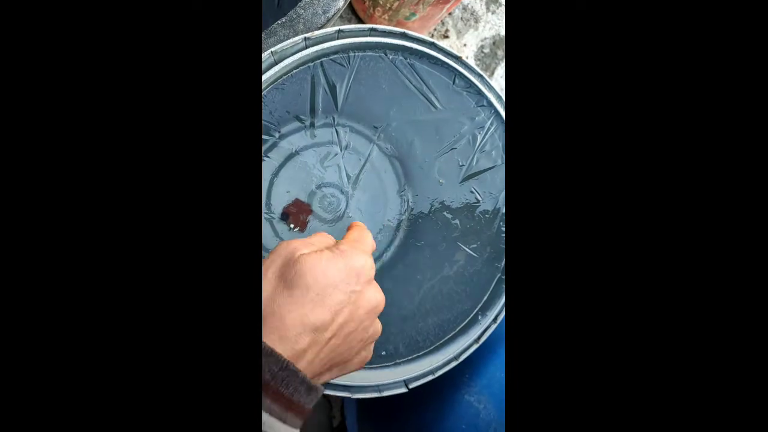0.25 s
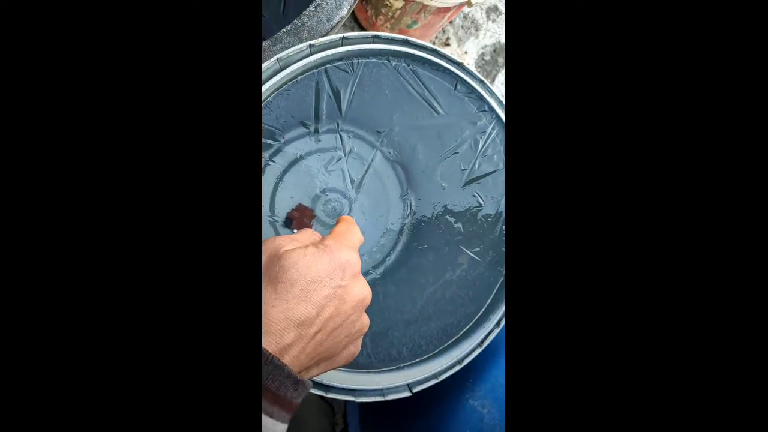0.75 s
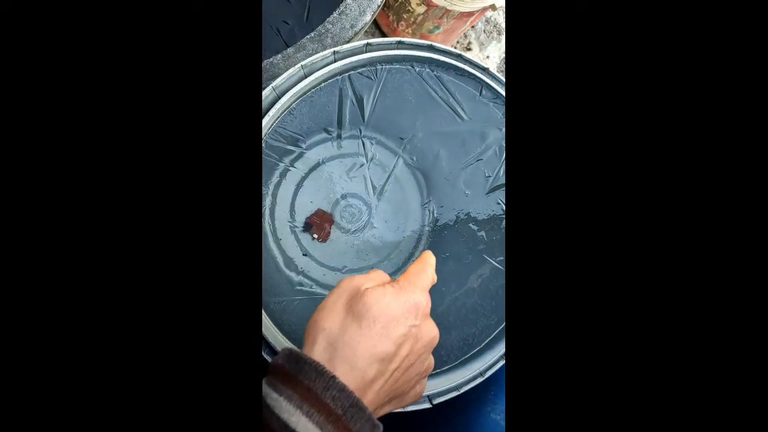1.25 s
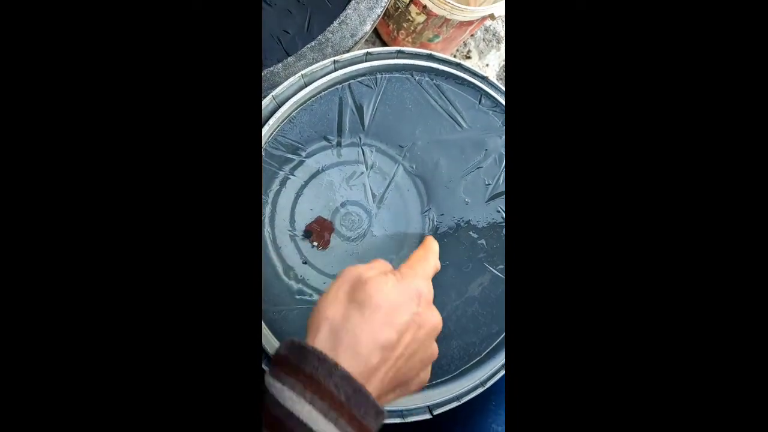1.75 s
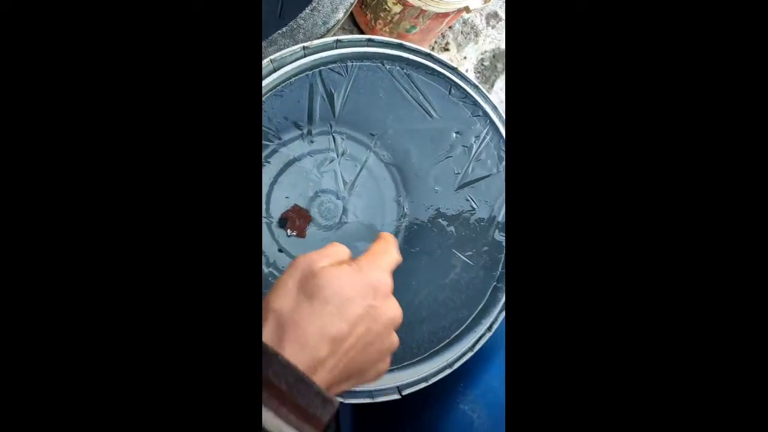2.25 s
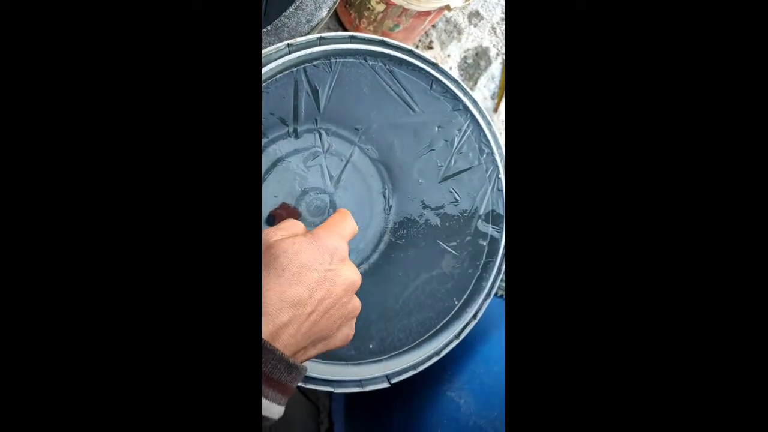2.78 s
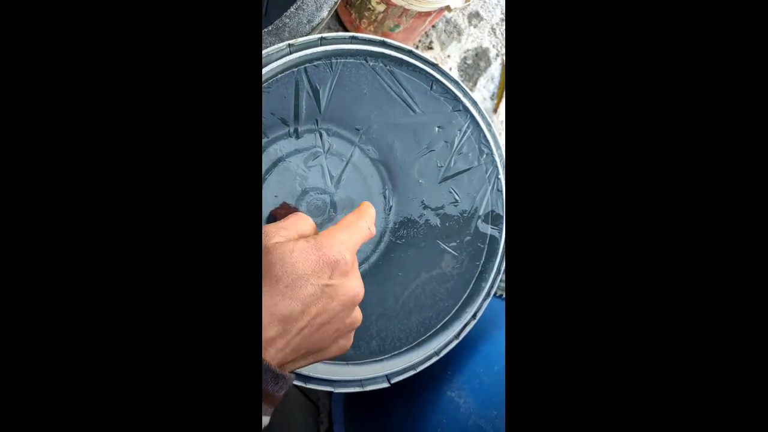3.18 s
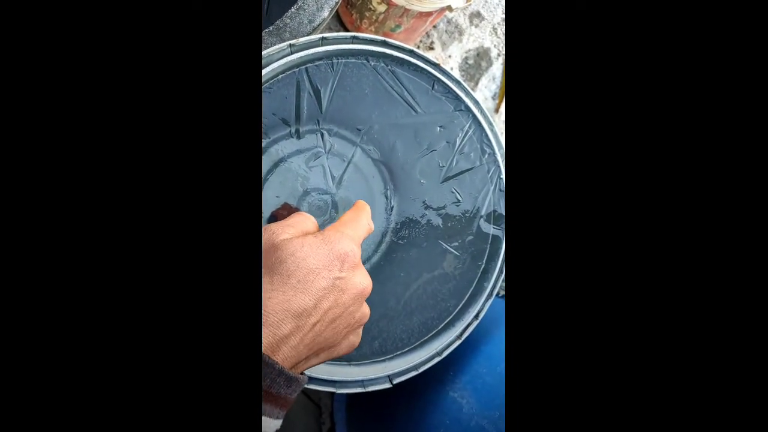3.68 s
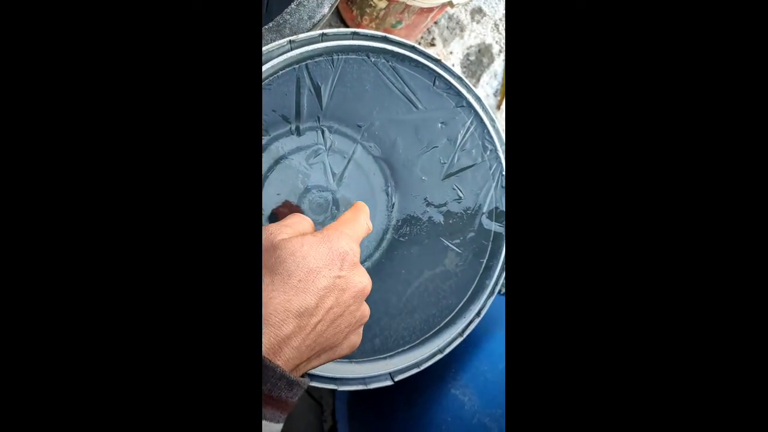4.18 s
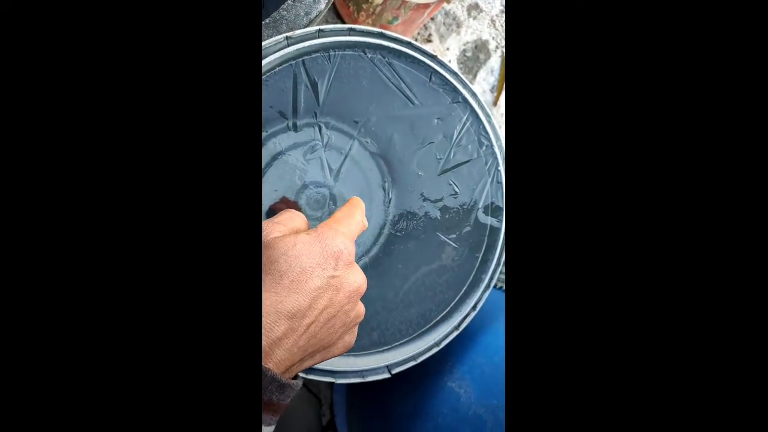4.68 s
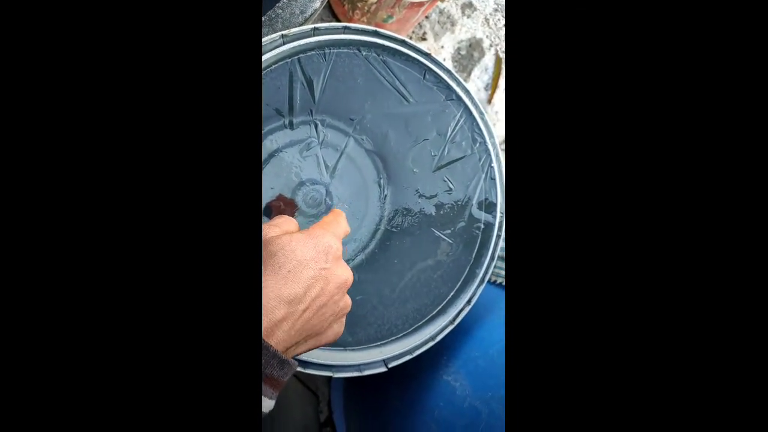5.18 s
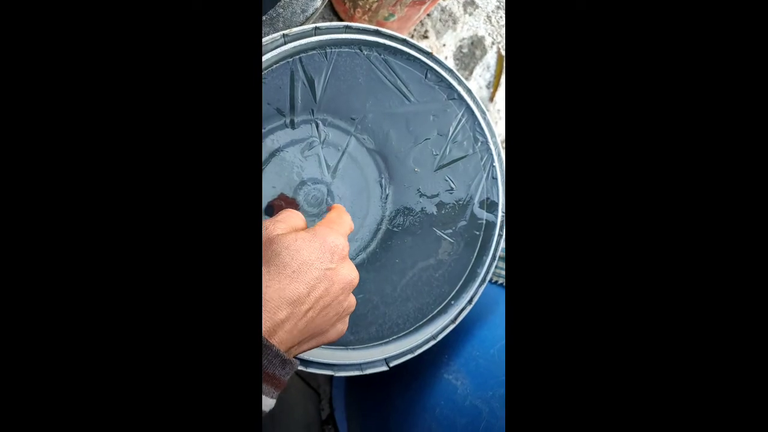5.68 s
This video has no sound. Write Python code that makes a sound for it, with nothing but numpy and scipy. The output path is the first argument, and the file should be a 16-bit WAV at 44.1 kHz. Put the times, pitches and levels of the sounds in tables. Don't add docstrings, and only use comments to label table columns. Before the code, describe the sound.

A quiet yard heard through a stereo phone microphone close above a bucket with a thin cracked ice sheet. From 0 to 1 s, five light nail taps tick softly, roughly every quarter second, each with a small dull knock and low hum. From 1.2 to 2.06 s the finger slides: grainy rasp, thin wet hiss, sharper catches around 1.4 s and a stronger rub near 1.9 s. At 2.3 s tapping resumes harder; brittle, glassy snaps hit at 2.56 and 3.03 s, then 3.3, 3.57, 3.99, 4.46 and 4.93 s, with short crackling tails, brief scuffs and bucket thuds. Softer taps follow at 5.2, 5.44, 5.64 and 5.87 s. A distant bird whistles fast, high, falling warbles at 0, 0.8, 1.7, 2.2 and 4.7 s, one barely audible at 4.2. Faint drones waver after 3 s. Breeze bumps low on the left throughout, with slight sleeve rustles.

```python
import sys
import numpy as np
from scipy import signal
from scipy.fft import rfft, irfft, next_fast_len
from scipy.io import wavfile
from scipy.ndimage import uniform_filter1d

SR = 44100
rng = np.random.default_rng(int(sys.argv[2]) if len(sys.argv) > 2 else 0)


def log_audio(samples):
    frames = np.atleast_2d(samples).T
    limited = np.clip(frames, -1, 1)
    pcm = np.round(limited * 32767).astype(np.int16)
    wavfile.write(sys.argv[1], SR, pcm)


def volts_from_decibels(level):
    exponent = np.asarray(level, float) / 20
    return 10 ** exponent


N = 261954
LEAD = 220

# [t/s, peak level/dB, brightness/dB per octave, plate ring f/Hz, after-crackle/dB]
CRACKS = [(0.0003, -50.5, -5, 3700, -10), (0.2544, -40, -1.5, 3250, -10), (0.2598, -36, 4.5, 3280, -25.5),
          (0.5363, -47.5, -4, 3800, -13), (0.7506, -44, -2, 3920, -10.5), (0.9763, -53, 0.5, 3130, -7),
          (2.3139, -31, -4, 3550, -22), (2.319, -39, -2, 3540, -30), (2.5599, -16, 0.3, 3260, -23),
          (2.8169, -36.5, -3, 3670, -19), (3.0316, -15, 0, 3770, -27.5), (3.296, -26.5, 2, 3700, -22),
          (3.572, -21.5, 2.5, 3470, -26), (3.9878, -17.5, 7, 4070, -26.5), (4.4621, -22, 2.5, 3760, -18),
          (4.9317, -21.5, -1.5, 3700, -26.5), (5.1927, -32.5, -2, 3700, -19.5),
          (5.44, -41, -1.7, 3800, -16.5), (5.6414, -31, -2.5, 3700, -23),
          (5.8726, -38.5, -2.5, 3200, -15.5)]
# [fracture spread/ms, lower ring f/Hz, its level/dB]
SHARDS = [(1.2, 1500, -6), (0.69, 1470, 9), (1, 3270, 6.5), (0.78, 1500, -1), (0.66, 2070, 7),
          (1.3, 2200, 4), (0.6, 4300, 0.5), (.8, 3500, -11), (1.4, 4700, 5), (0.54, 1280, 6),
          (1.07, 1550, -0.5), (1.33, 2990, 4), (1.04, 1100, 9.5), (0.57, 1600, 13), (0.79, 2540, 8),
          (0.49, 2000, 9), (1.05, 4120, -0.5), (1.4, 3400, 2.5), (1.2, 1460, 8.5), (1.7, 3800, 4.5)]
# [f/Hz, level/dB]
PLATES = [(3100, 3), (6000, -1), (6000, 4), (6500, 2), (6500, -1), (6500, 0), (3200, 6), (6500, -16),
          (3040, 1), (6500, -1), (3060, -6), (4200, 0), (6100, 7), (6100, 4.5), (6000, 1), (2136, -8),
          (4140, 2.5), (5960, -1.5), (4400, 1.5), (5000, -3)]
# [tap t/s, [(f/Hz, level over the snap/dB), ..]]
PINGS = [
    (2.316, [(3450, 2.5), (4830, 9), (7730, 11)]),
    (2.562, [(3340, 5.5), (5430, 4), (6130, 6.5), (7860, 5.5), (8520, 4.5), (11100, 6.5)]),
    (3.033, [(2190, 7.5), (2680, 9.5), (3760, 7), (4080, -6.5), (5330, 6.5), (7350, 4.5), (7870, 1.5), (9620, 2.5)]),
    (3.296, [(3260, 7), (4030, 10), (6630, 5), (8300, 3.5)]),
    (3.573, [(3610, -3), (4440, 5), (6050, -3), (7690, 12)]),
    (3.987, [(1740, 9.5), (2700, -5), (4010, 4.5), (5490, 8), (7020, 8), (9160, 4), (10900, 8.5)]),
    (4.461, [(3130, 4), (3740, 2), (4130, 6), (7340, 1), (9420, 6)]),
    (4.932, [(3120, 4), (3760, 5), (4330, 4.5), (8300, 5.5)]),
]
# [t/s, peak level/dB, brightness/dB per octave]
BOUNCES = [(0.172, -50, 9.5), (0.1905, -64, 4), (0.552, -72, 8), (0.567, -66, 0), (1.0157, -61.5, 0),
           (1.036, -61.5, 1), (1.2836, -54, -1), (1.651, -67, -4), (2.354, -55.5, -5), (3.617, -55.5, 1),
           (4.0328, -40.5, 0), (0.297, -66, -4), (5.892, -58, 4), (4.5049, -44.5, 0), (5.463, -56.5, 8),
           (5.685, -57, 0.5), (5.692, -60.5, -5)]
# [t/s, peak level/dB]
RUNS = [(3.9846, -33), (3.985, -21), (3.987, -23), (3.991, -31), (5.1892, -37.5), (5.6395, -35),
        (3.2948, -30.5), (4.4566, -34), (4.4596, -26), (4.4657, -31.5)]
# [t/s, peak level/dB]
MORE_RUNS = [
    (2.5635, -26),
    (3.9897, -24.5),
    (4.5068, -48),
]
# [f/Hz, level/dB per Hz]
SNAP = [(470, -60.5), (800, -19), (1730, -11.5), (1940, -13), (2200, -3), (2440, -9.5), (3750, 3.5),
        (4650, -4), (7920, -1), (12600, -7.5), (15100, -6), (15500, -19.5), (16500, -35.5)]
# [t/s, left-right level/dB]
HAND = [(0, -1.5), (1, -2), (2.3, -0.5), (3.3, 1), (3.6, -1), (4.46, 1.5), (4.93, 3), (5.2, 0.5),
        (5.44, 2.5), (5.9, -0.5)]
# [f/Hz, left-right level/dB]
PORTS = [(60, 6.5), (110, 3.5), (200, 4), (380, 4), (700, 3), (1290, -2), (2380, -1), (4400, -1),
         (6000, -5.5), (8120, -12), (11500, -8), (15000, -4)]

# [t/s, strength/dB, dead knock/dB, bucket hum/dB, deep sheet tone/dB]
KNOCKS = [(.001, -42, -13, 1.5, 6.5), (0.255, -34, -3, 0.5, 6.5), (0.536, -37.5, -38, -2, 3),
          (0.752, -36, -8.5, -2, 7.5), (0.981, -43, -4.5, 1, -4.5), (2.3148, -29, 3, -1.5, 2.5),
          (2.56, -27.5, 2.5, -3.5, -3), (2.817, -36, 0, 1.5, 3), (3.031, -32, -15.5, -2, -1),
          (3.2966, -33.5, 2.5, 0.5, 1.5), (3.5712, -30.5, 0, -3.5, -0.5), (3.9863, -29, 4.5, -1.5, -5.5),
          (4.4599, -30, 3, 0, -5), (4.932, -33.5, -0.5, 0, -0.5), (5.1921, -33, -2.5, -2, 0),
          (5.4424, -36, -0.5, -1.5, 1.5), (5.6413, -33.5, -1, -3, 2), (5.8752, -36.5, -2.5, 0, 5)]
# [dead knock f/Hz, ringing sheet level/dB]
BODIES = [(225, 3.5), (227, -0.5), (225, -2.5), (225, 2), (260, 0), (234, -0.5), (218, -1.5), (232, 3.5),
          (250, 0.5), (248, 0.5), (255, -0.5), (240, -6.5), (229, -4), (233, -1), (227.7, -1.5),
          (231.5, 0.5), (222, 1), (228, 4)]
# [f/Hz, level/dB]
NAIL_TICK = [(120, -11), (200, 0), (320, 6), (550, -0.5), (900, -3), (1600, -8.5), (3000, -20)]
# [f/Hz, level/dB, t60/s, sign of the mode shape under the finger]
DEAD = [(151, -34.5, 0.069, -1), (223.6, 4.5, 0.031, -1), (360, -14.5, 0.045, -1), (681, -21, 0.053, 1)]
# [f/Hz, level/dB, t60/s, sign]
SHEET = [(235, -11.5, 0.069, -1), (266, -17, 0.18, 1), (279.4, -11, 0.13, -1), (333.2, -24, .1, 1),
         (445, -21, 0.078, 1), (820, -32, .05, 1)]
# [f/Hz, level/dB, t60/s, sign]
DEEP = [(162, -25.5, 0.011, 1), (200.5, -11.5, 0.15, -1)]
# [f/Hz, level/dB, t60/s, sign]
BUCKET = [(49.6, -15, 0.27, 1), (54.4, -20.5, 1, 1), (65.8, -19.5, 1, -1), (77.5, -35.5, 0.83, 1),
          (82.5, -1.5, 0.11, -1), (96, -12.5, 0.21, -1), (104, -33, 0.12, -1)]

# [t/s, length/s, level/dB, hiss/dB]
SCUFFS = [(0.268, 0.029, -78, -2), (2.32, 0.041, -56, -21), (3.038, 0.073, -65, 1.5),
          (3.303, 0.065, -70, -1), (3.577, 0.054, -65, -1.5), (3.997, 0.064, -61.5, -2),
          (4.476, 0.049, -63.5, 7), (5.197, .035, -68, -6.5), (5.655, 0.057, -70, -1.5),
          (5.881, 0.022, -73.5, -4), (4.942, 0.056, -68, -2)]
# [t/s, speed as rasp level/dB, wetness as hiss level/dB]
GLIDE = [(1.198, -70, -70.5), (1.25, -68.5, -71), (1.3, -74, -75), (1.37, -67, -68.5), (1.415, -63, -58),
         (1.47, -65, -65), (1.5, -67, -66.5), (1.57, -90, -78), (1.645, -71, -72), (1.655, -73, -65.5),
         (1.74, -78, -74.5), (1.795, -66, -69.5), (1.83, -69, -67), (1.866, -69, -68), (1.9, -58, -59.5),
         (1.98, -60.5, -61), (2.005, -65.5, -68), (2.062, -75, -76)]
# [t/s, f/Hz]
NAIL_TILT = [(1.2, 3480), (1.358, 3650), (1.382, 3330), (1.522, 3360), (1.568, 3730), (1.608, 3350),
             (1.676, 3350), (1.742, 3640), (2.06, 3390)]
# [t/s, peak level/dB, length/ms]
SLIPS = [(1.2012, -58.5, 3), (1.233, -58, 3), (1.3315, -66, 1.5), (1.352, -60, 3.4), (1.3955, -44.5, 3.6),
         (1.4077, -35.5, 1.8), (1.418, -36.5, 1.2), (1.4226, -39, 2.8), (1.4452, -45.5, 3),
         (1.457, -51, 2.7), (1.4861, -43.5, 3.5), (1.8364, -55, 2), (1.8418, -49, 3), (1.8505, -53, 1.8),
         (1.891, -54, 2.6), (1.9138, -57, 3.4), (1.944, -47.5, 1.8), (2.04, -59, 2.7)]
# [t/s, level/dB, length/s, f/Hz]
FLEXES = [(1.21, -63, 0.0087, 432), (1.24, -60.5, 0.021, 308), (1.275, -60.5, 0.028, 308),
          (1.395, -64, 0.016, 320), (1.43, -64, 0.026, 545), (1.434, -61.5, 0.024, 1077),
          (1.53, -70.5, 0.079, 448), (1.585, -67.5, 0.015, 300), (1.63, -59.5, 0.023, 312),
          (1.655, -60.5, 0.0075, 900), (1.7, -71, 0.066, 300), (1.775, -57.5, 0.017, 260),
          (1.8, -55, 0.021, 443), (1.79, -65, 0.023, 840), (1.85, -57.5, 0.013, 312),
          (1.885, -66, 0.016, 272), (1.93, -64, 0.021, 326), (1.97, -62.5, 0.017, 214),
          (1.965, -66, 0.019, 480), (2.04, -66.5, 0.022, 280)]
# [f/Hz, width/Hz, level/dB]
RASP = [(2270, 140, -6), (3330, 160, 5), (3800, 390, 0.5), (5300, 960, -14.5)]
# [f/Hz, width/Hz, level/dB]
HISS = [(5900, 3200, 6), (8500, 1500, 2.5), (11400, 6600, -0.5)]
# [f/Hz, width/Hz, level/dB]
SHEET_LOWS = [(212, 15, -9), (314, 27, 9), (481, 57, -2.5), (845, 890, -10.5)]

# [start t/s, length/s, level/dB, first f/Hz, pitch drop/Hz, quaver/Hz]
BIRD = [
    (0, 0.18, -62.5, 6980, 330, 328),
    (0.769, 0.188, -64, 7400, 1046, 100),
    (1.665, 0.16, -68.5, 7300, 178, 100),
    (2.174, 0.23, -63.5, 7120, 456, 60),
    (4.175, 0.087, -79.5, 7670, 600, 60),
    (4.725, 0.17, -65, 7810, 1395, 100),
]
# [start t/s, end t/s, f/Hz, width/Hz, level/dB]
DRONES = [
    (3.11, 3.47, 207, 5, -72),
    (3.33, 3.56, 480, 14, -83),
    (4.12, 4.8, 478, 14, -84),
    (3.75, 3.82, 660, 30, -81),
    (3.75, 3.81, 1910, 25, -83),
    (3.76, 3.81, 2240, 30, -83),
]

# [t/s, peak level/dB, length/s]
GUSTS = [(.05, -44.5, 0.057), (.17, -46.5, 0.04), (.38, -50, 0.14), (.73, -45.5, 0.12), (.98, -52.5, 0.16),
         (1.28, -55.5, 0.26), (1.53, -58, .12), (1.8, -43.5, 0.073), (2.02, -56.5, 0.17),
         (2.2, -49.5, 0.079), (2.33, -38, 0.03), (2.58, -50.5, 0.091), (2.93, -46.5, 0.15),
         (3.12, -54.5, 0.064), (3.33, -51.5, 0.074), (3.59, -48.5, 0.082), (3.85, -51, 0.13),
         (4.0, -43, 0.053), (4.2, -54, 0.095), (4.4, -42, 0.087), (4.6, -44, 0.079), (5.01, -50, 0.075),
         (5.22, -47, 0.051), (5.34, -48.5, 0.052), (5.49, -44, 0.085), (5.83, -54, 0.13)]
# [f/Hz, level/dB]
BUMPS = [(5, -14), (12, -1.5), (22, 0), (36, -9.5), (60, -27), (120, -47.5), (400, -77.5)]
# [t/s, peak level/dB, width/ms, sign]
PUFFS = [(0.716, -31, 8.6, -1), (0.762, -33.5, 4.7, 1), (1.285, -43, 16.6, 1), (1.79, -43, 16, 1),
         (.902, -35, 6.4, 1), (1.491, -38, 5.24, 1), (1.507, -32, 9.8, -1), (1.574, -32.5, 7, 1),
         (4.362, -34, 3.7, 1), (4.399, -34.5, 4, 1), (4.485, -35, 5.9, 1), (4.575, -35, 11.7, 1),
         (5.482, -33, 7.7, 1), (5.795, -36.5, 8, 1)]
# [t/s, peak level/dB, length/s]
RUSTLES = [(.05, -61.5, 0.21), (.24, -63, 0.022), (.35, -65, 0.024), (.51, -62, 0.028), (.74, -65.5, 0.022),
           (1.05, -67, 0.36), (1.72, -59, 0.14), (2.33, -67, 0.065), (2.58, -62, 0.057), (3.13, -78, 0.04),
           (3.32, -72, 0.089), (4.9, -68, 0.042), (5.92, -72, 0.065)]
# [f/Hz, level/dB per Hz]
AIR = [(58, -24), (88, -3), (135, -10.5), (266, -14), (424, -19), (503, -18.5), (559, -19.5), (1330, -24.5),
       (5260, -27.5), (8380, -25.5), (12500, -29), (15450, -29), (15800, -54.5)]
# [f/Hz, likeness 0-1]
SAME = [(60, 0.27), (130, 0.94), (290, 0.091), (1400, 0.1), (5000, 0.029)]

AIR_DB, LULL_DB, STILL_DB = -75, -58.5, -86
USUAL_RING_HZ = 3700
RUN_SPREAD_MS, RUN_AFTER_DB = 1.4, -30
BOUNCE_SPREAD_MS, BOUNCE_AFTER_DB = 1, -17
SHARD_OCTAVES, PING_WIDTH_HZ = .22, 170
ECHO_DB, ECHO_T60_MS, ECHO_TOP_HZ = -13.5, 330, 9973
PATCHY_DB, CRACKLE_DB = 1.8, 0.6
SLOSH_DB = 1.8
SCUFF_FADE_DB = -11
STROKE_EDGE_S, RASP_DB, FIZZ_DB, NAIL_USUAL_HZ = .006, 0.8, 2, 3480
SLIP_RISE_MS, SLIP_HISS_DB = 0.52, -15.5
FLEX_WIDTH_HZ, FLEX_RING_DB = 46, 9
CALL_SWELL_DB, CALL_SWELL_S = -3.5, 0.027
CALL_SAG, CALL_FADE_DB, CALL_FADE_BEND = 1.15, -19.5, 3.3
CALL_SCOOP_HZ, CALL_SCOOP_S, QUAVERS_PER_S = 920, 0.0058, 55
OVERLOAD = .72


def read(points, hz):
    f, value = np.transpose(points)
    return np.interp(np.log(hz + 1), np.log(f + 1), value)


def evened(x):
    return x / np.sqrt(np.mean(x ** 2) + 1e-20)


def smooth_noise(count, size):
    once = uniform_filter1d(rng.standard_normal(count), size=size)
    return evened(uniform_filter1d(once, size=size))


def add(mix, s, sound):
    part = mix[..., round(s * SR):][..., :sound.shape[-1]]
    part += sound[..., :part.shape[-1]]


def colour(x, points, share=1, causal=False):
    size = x.shape[-1]
    log_gain = share * read(points, np.fft.rfftfreq(size, 1 / SR)) * np.log(10) / 20
    if causal:
        fold = np.r_[1, 2 * np.ones(size // 2 - 1), 1, np.zeros(size // 2 - 1)]
        log_gain = rfft(irfft(log_gain, size) * fold)
    return irfft(rfft(x) * np.exp(log_gain), size)


def ring(modes, t, detune=0.):
    shift = 1 + detune * rng.standard_normal(len(modes))
    return sum(np.sign(sign) * volts_from_decibels(db - 60 * t / t60) * np.sin(2 * np.pi * hz * k * t)
               for (hz, db, t60, sign), k in zip(modes, shift))


def resonate(x, peaks):
    t = np.arange(1024) / SR
    body = sum(volts_from_decibels(db) * width * np.exp(-np.pi * width * t) * np.sin(2 * np.pi * hz * t)
               for hz, width, db in peaks)
    return signal.oaconvolve(x, body)[:len(x)]


def sweep(x, hz, width, db):
    turn = np.exp(2j * np.pi * np.cumsum(hz) / SR)
    r = np.exp(-np.pi * width / SR)
    return volts_from_decibels(db) * (turn * signal.lfilter([1 - r], [1, -r], x / turn)).imag


def bells(rows, t, base_db):
    return volts_from_decibels(base_db) + sum(volts_from_decibels(db) * np.exp(-((t - s) / length) ** 2) for s, db, length in rows)


def blotched(x, depth_db):
    z = signal.stft(x, nperseg=256)[2]
    field = rng.standard_normal(z.shape[1:])
    for _ in range(2):
        field = uniform_filter1d(uniform_filter1d(field, size=4, axis=0), size=5, axis=1)
    return signal.istft(z * volts_from_decibels(depth_db * evened(field)), nperseg=256)[1][:, :x.shape[1]]


def shaded(left, right):
    return np.array([colour(left, PORTS, share=1.0), colour(right, PORTS, share=-0.42)])


def ports(x, scatter=0.14, onset_hz=500):
    hz = np.fft.rfftfreq(len(x), 1 / SR)
    knots = np.arange(0, SR / 2, 400)
    phase = np.pi / 2 + scatter * np.interp(hz, knots, rng.standard_normal(len(knots)))
    right = irfft(rfft(x) * np.exp(-1j * phase * hz / (hz + onset_hz)), len(x))
    return shaded(x, right)


def air():
    size = next_fast_len(N)
    t, hz = np.arange(size) / SR, np.fft.rfftfreq(size, 1 / SR)
    a, b, c, d, e, f = rng.standard_normal((size, 6)).T
    same = np.clip(read(SAME, hz), 0, 1)
    other = irfft(same * rfft(a) + np.sqrt(1 - same ** 2) * rfft(b), size)
    hush = colour(np.array([a, other]), AIR)
    hush *= volts_from_decibels(AIR_DB + 2.5) / colour(hush, [(99, -99), (101, 0)]).std()
    cloth = [(150, -32.0), (300, -2.0), (900, -4.5), (2500, -14.0), (9000, -21.0)]
    rustle = evened(colour(np.array([e, .4 * e + f]), cloth))
    rustle = volts_from_decibels(-9.5) * bells(RUSTLES, t, STILL_DB) * rustle
    bumps = evened(colour(c, BUMPS))
    bumps /= np.sqrt(uniform_filter1d(bumps ** 2, size=4000) + 2.4)
    bumps = bells(GUSTS, t, LULL_DB) * bumps * volts_from_decibels(np.array([[5], [-14]]))
    far_port = evened(colour(d, BUMPS)) * volts_from_decibels(-66.5)
    return hush + rustle + bumps + far_port * np.array([[0], [1]])


def bird(start, length, db, first_hz, drop_hz, quaver_hz):
    t = np.arange(10000) / SR
    u = np.minimum(t / length, 1)
    unsteady = evened(uniform_filter1d(rng.standard_normal(len(t)), size=300))
    wander = smooth_noise(len(t), 900)
    warble = np.sin(2 * np.pi * np.cumsum(205 * (1 + 0.133 * unsteady)) / SR)
    hz = first_hz - drop_hz * u ** CALL_SAG + 120 * wander + 380 * warble + 40 * unsteady[::-1]
    hz += quaver_hz * np.sin(2 * np.pi * QUAVERS_PER_S * t - 1.5)
    hz -= (start > 0) * CALL_SCOOP_HZ * np.exp(-t / CALL_SCOOP_S)
    tone = np.sin(2 * np.pi * np.cumsum(hz) / SR)
    tone *= volts_from_decibels(0.79 * warble + 2.0 * unsteady + 2.0 * wander[::-1])
    echoes = rng.standard_normal((2, 2000)) * volts_from_decibels(-60 * np.arange(2000) / SR / 0.12) * 0.067
    echoes[:, 0] = 1
    call = signal.fftconvolve(tone[None], echoes, axes=1)[:, :len(t)]
    level = volts_from_decibels(db + CALL_SWELL_DB * np.exp(-t / CALL_SWELL_S) + CALL_FADE_DB * u ** CALL_FADE_BEND)
    level *= np.clip(np.minimum(t, length - t) / 0.0047, 0, 1)
    return start, level * call / call.std(axis=1, keepdims=True) * volts_from_decibels(np.array([[-7], [5]]))


def snap_spectrum(s, slope_db, ring_hz, rings):
    strongest = np.argmax(np.transpose(SNAP)[1])
    tilt = [(ring_hz if k == strongest else hz, level_db + slope_db * np.log2(max(hz, 2500) / 5000))
            for k, (hz, level_db) in enumerate(SNAP)]
    hz = np.geomspace(470, 16500, num=500)
    broad_db = sum(lift_db * np.exp(-(np.log2(hz / at_hz) / SHARD_OCTAVES) ** 2)
                   for at_hz, lift_db in rings)
    modes = [mode for tap, group in PINGS if abs(tap - s) < 1 / 100 for mode in group]
    narrow_db = sum(lift_db / (1 + (2 * (hz - at_hz) / PING_WIDTH_HZ) ** 2) for at_hz, lift_db in modes)
    return np.transpose([hz, read(tilt, hz) + broad_db + narrow_db])


def crack(s, db, spread_ms, slope_db, ring_hz, after_db, rings=()):
    ms = np.arange(-LEAD, 6260) / SR * 1000
    noise, size, plate, left, right = rng.standard_normal((len(ms), 5)).T
    u = np.maximum(ms, 0) / max(spread_ms, .2)
    lead_in = volts_from_decibels(-32.0) * (ms > -1.5) * (ms < spread_ms)
    swarm = noise * volts_from_decibels(8.2 * size) * (u ** 0.48 * np.exp(1 - u) + lead_in)
    plate = plate[:2000] * volts_from_decibels(-60 * (ms[:2000] - ms[0]) / 28)
    snap = rfft(signal.fftconvolve(swarm, np.r_[1, .06 * plate])[:len(ms)])
    snap = irfft(snap / np.sqrt(uniform_filter1d(abs(snap) ** 2, size=60)), len(ms))
    sudden = np.where(ms > 0, 1, volts_from_decibels(-15.0) * (ms > -1.6))
    snap *= sudden * volts_from_decibels(-.9 * np.maximum(ms - 9, 0))
    snap /= np.sqrt(uniform_filter1d(snap ** 2, size=44).max())

    fade = volts_from_decibels(-60 * ms / 90) + volts_from_decibels(ECHO_DB - 60 * ms / ECHO_T60_MS)
    trail = np.array([left, right]) * volts_from_decibels(after_db) * fade * np.clip(ms / 6, 0, 1)
    trail *= volts_from_decibels(CRACKLE_DB * evened(uniform_filter1d(size[::-1], size=90)))
    trail = signal.lfilter(*signal.butter(1, min(ECHO_TOP_HZ, 20000), fs=SR), trail)

    tilt = snap_spectrum(s, slope_db, ring_hz, rings)
    gain = np.sqrt(np.mean(volts_from_decibels(2 * read(tilt, np.linspace(0, SR / 2, num=200)))))
    sound = ports(colour(snap, tilt, causal=True))
    sound = sound + colour(trail, tilt, share=0.81) * volts_from_decibels(np.array([[-4], [-1.5]]))
    sound *= np.clip(ms + 2.5, 0, 1) * np.clip((140 - ms) / 30, 0, 1)
    pan_db = np.interp(s, *np.transpose(HAND))
    return volts_from_decibels(db + np.array([[.5], [-.5]]) * pan_db) * sound / gain


def knock(db, dead_db, hum_db, deep_db, dead_hz, sheet_db):
    t = np.arange(SR) / SR
    brief = t[:SR // 4]
    dead = [(hz * dead_hz / DEAD[1][0], *rest) for hz, *rest in DEAD]
    sheet = volts_from_decibels(dead_db) * ring(dead, brief, detune=0.0067)
    sheet = sheet + volts_from_decibels(sheet_db) * ring(SHEET, brief, detune=0.037)
    sheet = sheet + volts_from_decibels(deep_db) * ring(DEEP, brief, detune=0.022)
    sheet = np.pad(sheet, (0, len(t) - len(brief)))
    slosh = smooth_noise(len(t), 400)
    sheet *= volts_from_decibels(SLOSH_DB * slosh * np.clip(t / 0.0074 - 1, 0, 1))
    sheet *= 1 - np.exp(-(t / 0.0024) ** 2)
    hum = volts_from_decibels(hum_db) * ring(BUCKET, t) * (1 - np.exp(-t / 0.016))
    tick = evened(colour(rng.standard_normal((2, len(t))), NAIL_TICK))
    tick = tick * (volts_from_decibels(-18.0 - 60 * t / 0.092) + volts_from_decibels(-37.0 - 60 * t / 0.23))
    return volts_from_decibels(db + np.array([[.4], [-.4]])) * ((sheet + hum) * np.cos(np.pi * t / 2) + tick)


def scuff(length, db, hiss_db):
    t = np.arange(3000) / SR
    a, b, size = rng.standard_normal((len(t), 3)).T
    grains = volts_from_decibels(4.0 * size) * np.array([a, b])
    rub = [evened(resonate(c, RASP[1:])) + volts_from_decibels(hiss_db) * evened(resonate(c, HISS)) for c in grains]
    contact = np.clip(np.minimum(t, length - t) / 0.0034, 0, 1)
    return volts_from_decibels(db + SCUFF_FADE_DB * t / length) * contact * shaded(*rub)


def puff(db, width_ms, sign):
    u = np.arange(-1500, 2500) / SR * 1000 / width_ms
    pressure = np.exp(-u ** 2) - 0.42 * np.exp(-((u - 2.2) / 2) ** 2)
    return volts_from_decibels(db) * np.sign(sign) * pressure * np.array([[1], [.06]])


def slide():
    when, rasp_db, hiss_db = np.transpose(GLIDE)
    start, end = when[0], when[-1]
    t = start + np.arange(40000) / SR
    touch = np.clip(np.minimum(t - start, end - t) / STROKE_EDGE_S, 0, 1)
    rasp_gain = touch * volts_from_decibels(RASP_DB + np.interp(t, when, rasp_db))
    hiss_gain = touch * volts_from_decibels(FIZZ_DB + np.interp(t, when, hiss_db))
    a, b, c, d, size, clump, other = rng.standard_normal((len(t), 7)).T
    clump = evened(uniform_filter1d(clump, size=160))
    other = evened(uniform_filter1d(other, size=1100))
    patches = [volts_from_decibels(0.96 * np.roll(other, 3000 * k)) for k in range(len(RASP))]
    tilt = np.interp(t, *np.transpose(NAIL_TILT)) / NAIL_USUAL_HZ
    coarse = volts_from_decibels(5.3 * size + 2.3 * clump)
    rasp = [evened(sum(sweep(noise * coarse * flare, hz * tilt, width, db)
                       for (hz, width, db), flare in zip(RASP, patches)))
            for noise in (a, b)]
    fine = volts_from_decibels(4.5 * size + 2.2 * clump)
    fizz = [sum(resonate(noise * fine * flare[::-1], [peak]) for peak, flare in zip(HISS, patches))
            for noise in (c, d)]
    wet = [(3000, -0.5), (6000, 3.0), (10000, 2.0), (15300, -3.0), (15750, -40)]
    hiss = hiss_gain * evened(colour(np.array(fizz), wet))
    return start, blotched(volts_from_decibels(2.5) * shaded(*(rasp_gain * np.array(rasp) + hiss)), PATCHY_DB)


def slip(db, length_ms):
    ms = np.maximum(np.arange(-100, 900) / SR * 1000, 0)
    catch = rng.standard_normal((2, len(ms))) * np.exp(-ms / length_ms) * (1 - np.exp(-ms / SLIP_RISE_MS))
    sound = [evened(resonate(c, RASP)) + volts_from_decibels(SLIP_HISS_DB) * evened(resonate(c, HISS[1:2])) for c in catch]
    sound = signal.lfilter(*signal.butter(2, [2400, 9500], "band", fs=SR), sound)
    return volts_from_decibels(db - 3.0) * shaded(*sound) / np.sqrt(uniform_filter1d(sound[0] ** 2, size=60).max())


def flex(db, length, hz):
    u = np.arange(-4000, 4000) / SR / length
    peaks = SHEET_LOWS + [(hz, FLEX_WIDTH_HZ, FLEX_RING_DB)]
    lump = resonate(rng.standard_normal(len(u)), peaks) * np.exp(-u ** 2)
    return volts_from_decibels(db) * lump / np.sqrt(np.sum(lump ** 2) / np.sum(np.exp(-2 * u ** 2)))


def drone(start, end, hz, width, db):
    t = np.arange(start, end, 1 / SR)
    drift = signal.lfilter([1], [1, -np.exp(-np.pi * width / SR)], rng.standard_normal(len(t)))
    tone = np.sin(2 * np.pi * hz * t + 1.1 * evened(drift))
    return volts_from_decibels(db + 1.0) * tone * signal.windows.tukey(len(t), .3)


def scene():
    mix = np.pad(air()[:, :N], ((0, 0), (LEAD, 0)))
    lead = LEAD / SR
    for row in BIRD:
        s, call = bird(*row)
        add(mix, s + lead, call)
    for (s, db, *colours), (spread_ms, *shard), plate in zip(CRACKS, SHARDS, PLATES):
        add(mix, s, crack(s, db, spread_ms, *colours, (shard, plate)))
    for s, db, slope_db in BOUNCES:
        add(mix, s, crack(s, db, BOUNCE_SPREAD_MS, slope_db, USUAL_RING_HZ, BOUNCE_AFTER_DB))
    for rows, slope_db in ((RUNS, 0), (MORE_RUNS, 2)):
        for s, db in rows:
            add(mix, s, crack(s, db, RUN_SPREAD_MS, slope_db, USUAL_RING_HZ, RUN_AFTER_DB))
    for (s, *row), body in zip(KNOCKS, BODIES):
        add(mix, s + lead, knock(*row, *body))
    for s, *row in SCUFFS:
        add(mix, s + lead, scuff(*row))
    for s, *row in PUFFS:
        add(mix, s + lead - 1500 / SR, puff(*row))
    s, stroke = slide()
    add(mix, s + lead, stroke)
    for s, *row in SLIPS:
        add(mix, s + lead - 100 / SR, slip(*row))
    for s, *row in FLEXES:
        add(mix, s + lead - 4000 / SR, flex(*row))
    for row in DRONES:
        add(mix, row[0] + lead, drone(*row))
    return mix[:, LEAD:]


def band_limit(x):
    return signal.sosfilt(signal.butter(12, 16650, fs=SR, output="sos"), x)


def record(dry):
    dry = OVERLOAD * np.tanh(dry / OVERLOAD)
    limit = signal.firwin(511, 15950, window=("kaiser", 8), fs=SR)
    limit[255] += volts_from_decibels(-36)
    mix = signal.oaconvolve(dry, limit[None], "same", axes=1)
    return band_limit(mix)


dry = scene()
out = record(dry)
log_audio(out)
```